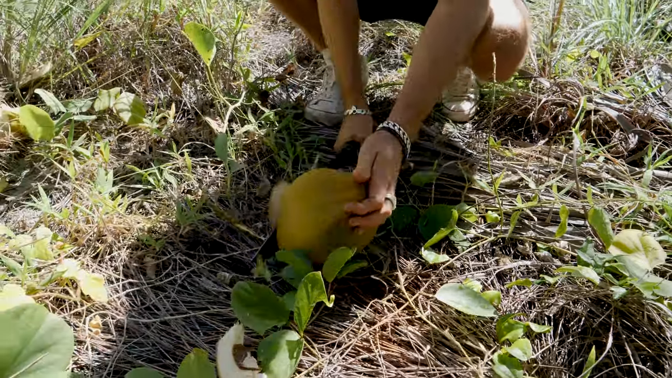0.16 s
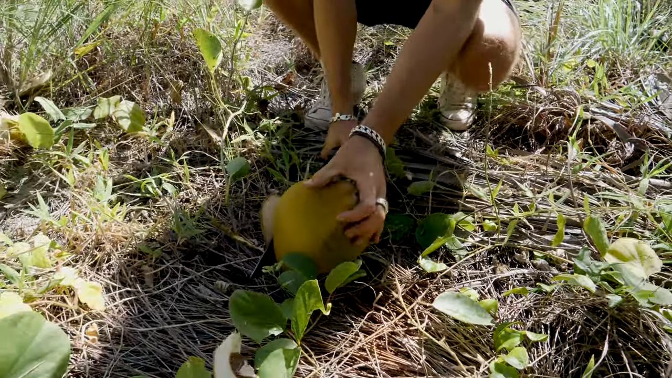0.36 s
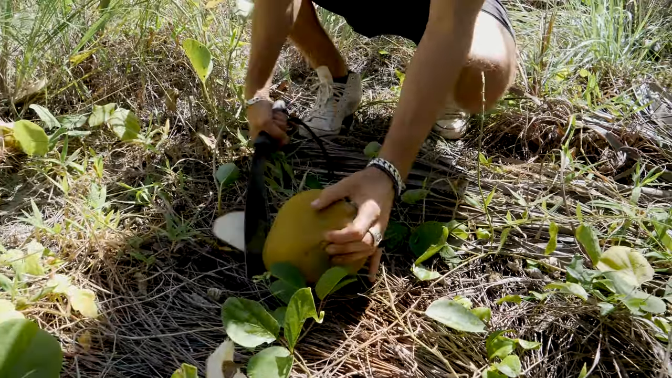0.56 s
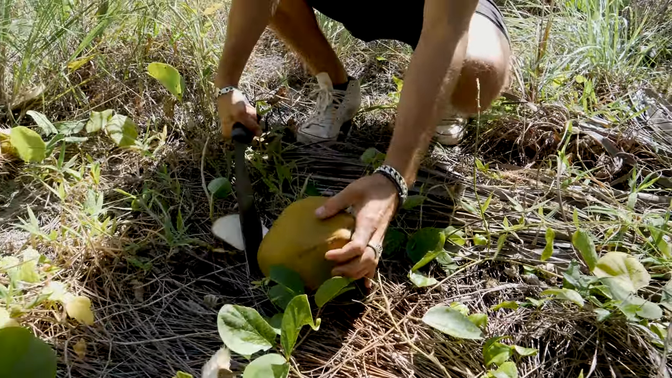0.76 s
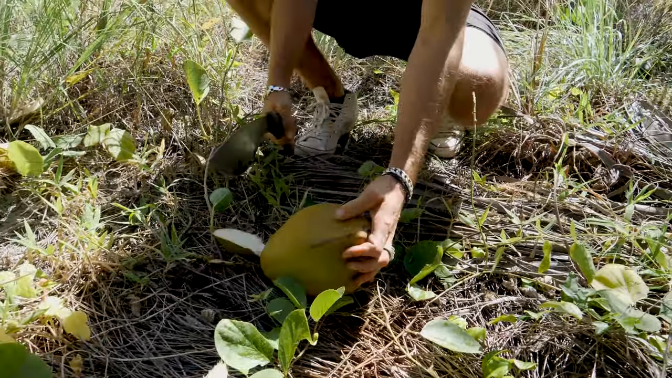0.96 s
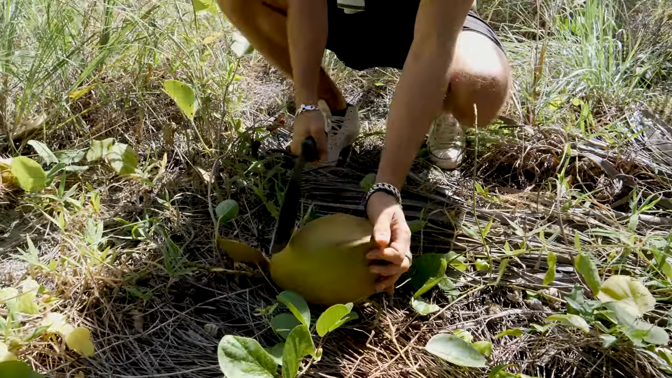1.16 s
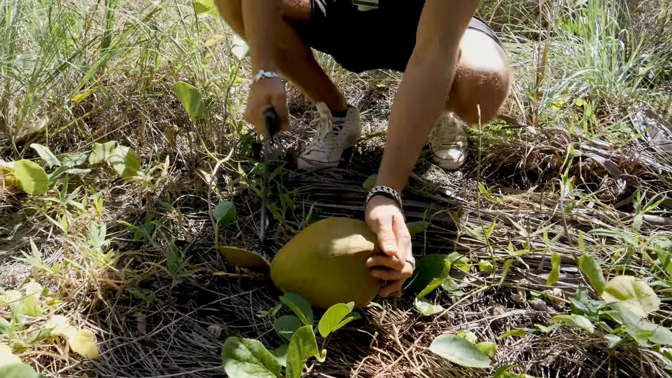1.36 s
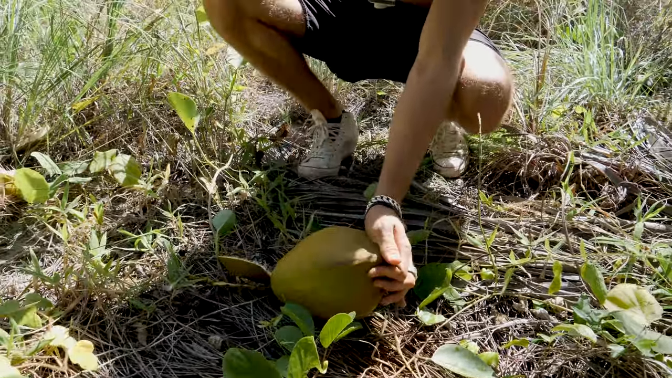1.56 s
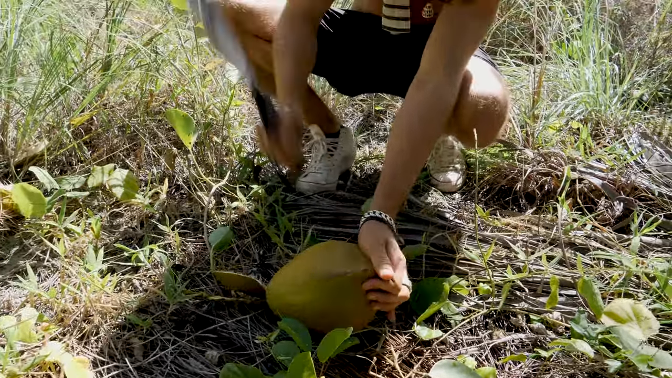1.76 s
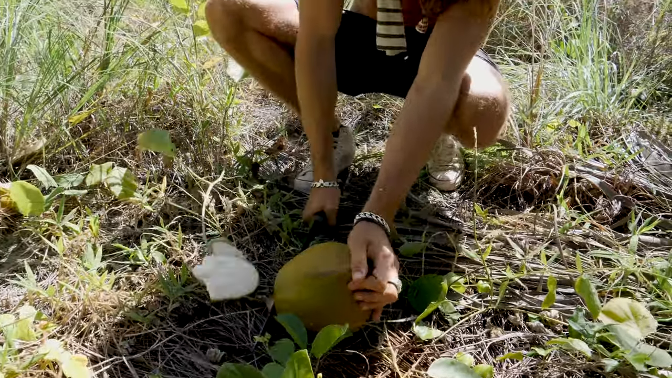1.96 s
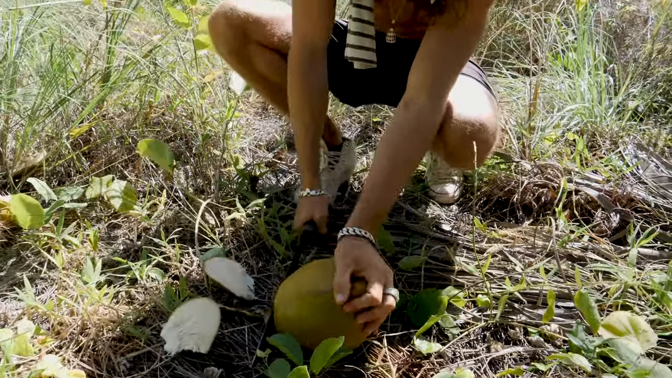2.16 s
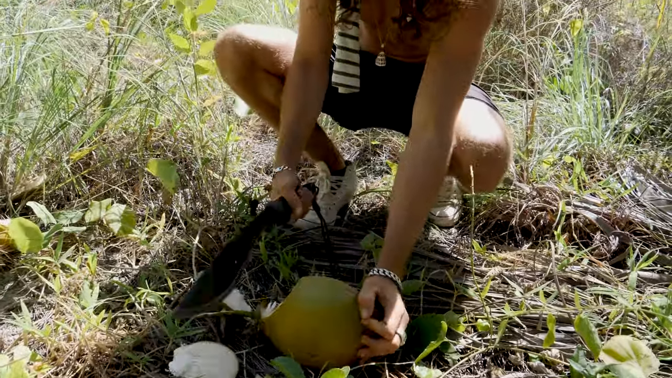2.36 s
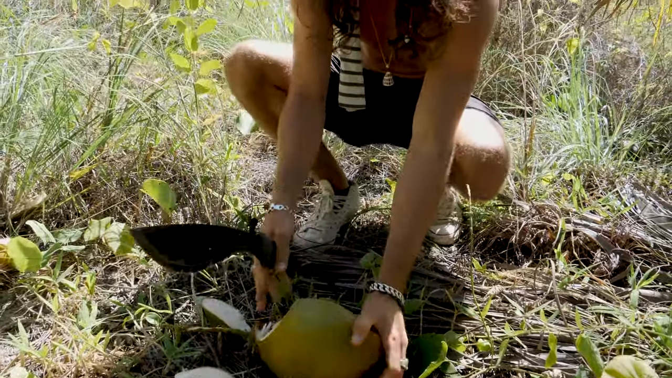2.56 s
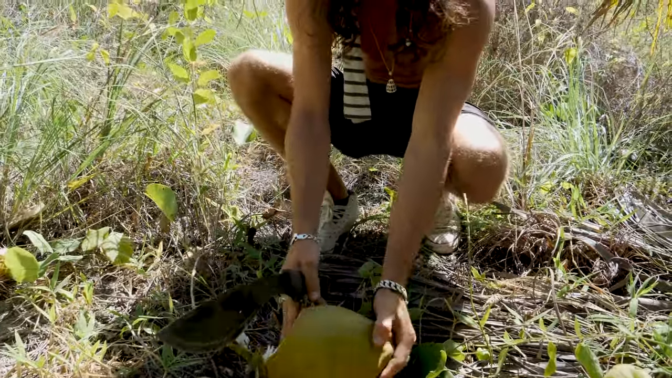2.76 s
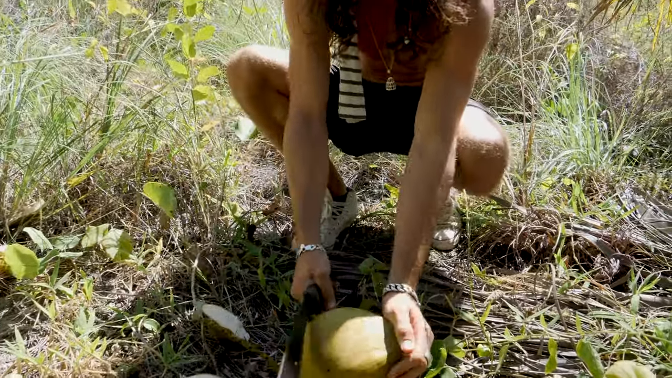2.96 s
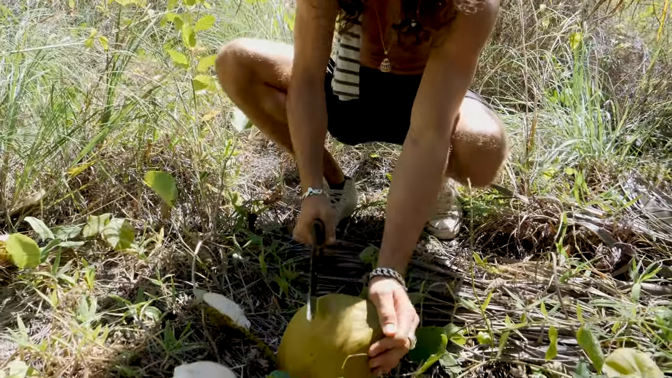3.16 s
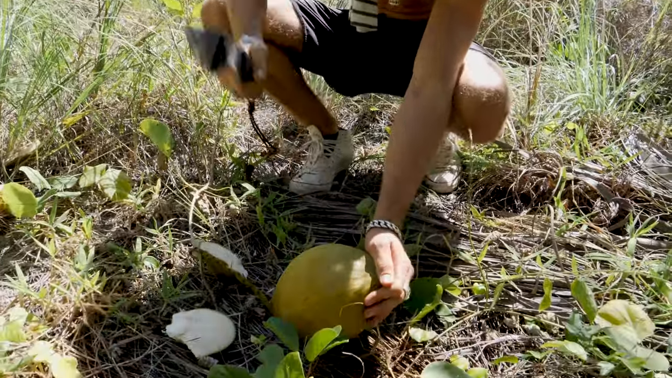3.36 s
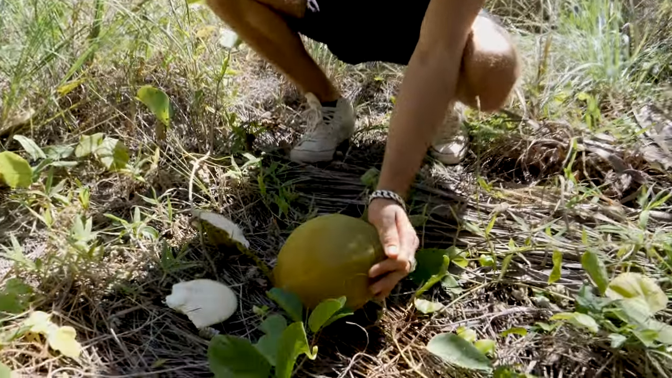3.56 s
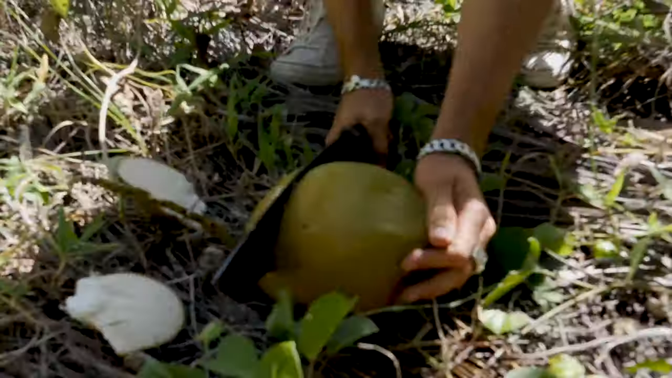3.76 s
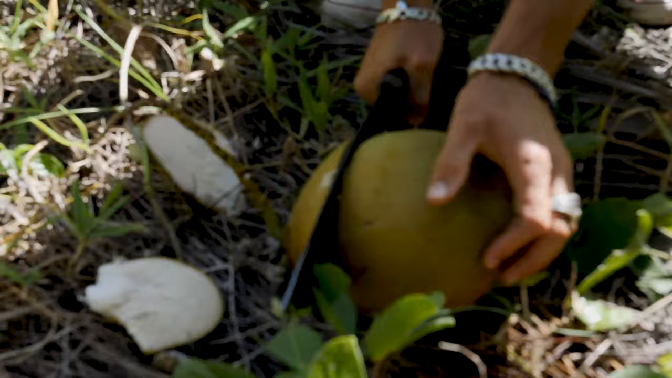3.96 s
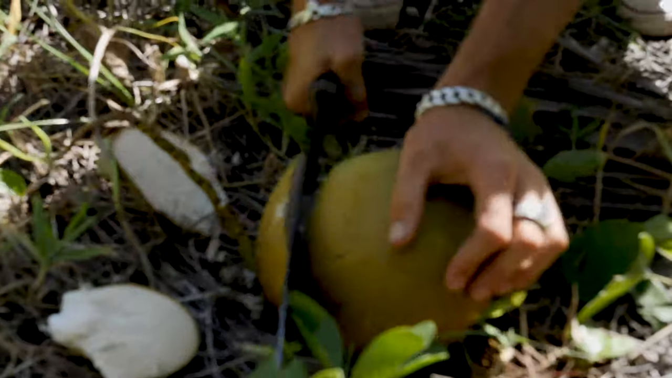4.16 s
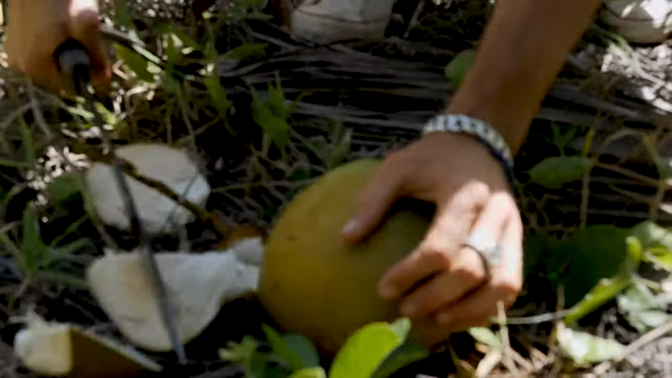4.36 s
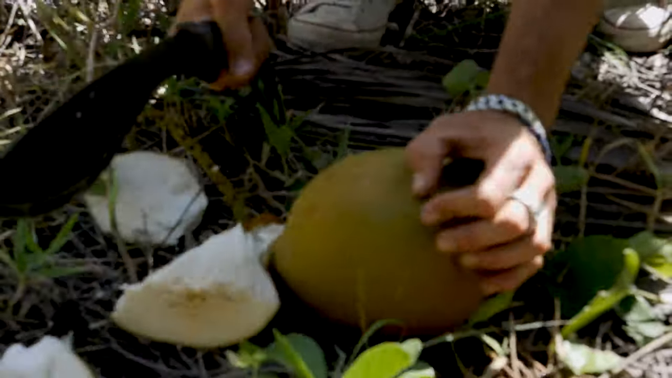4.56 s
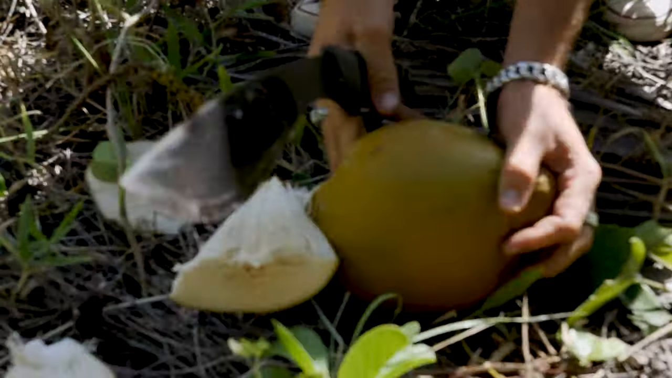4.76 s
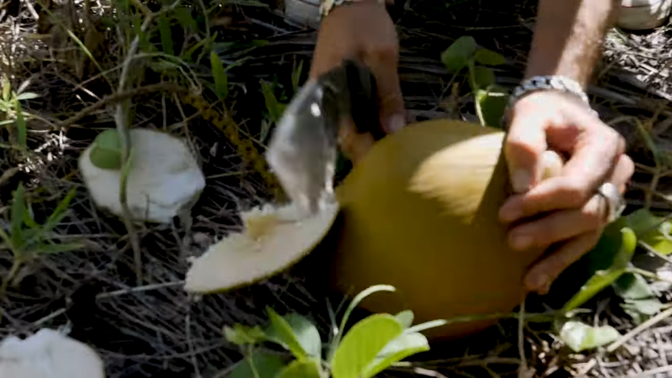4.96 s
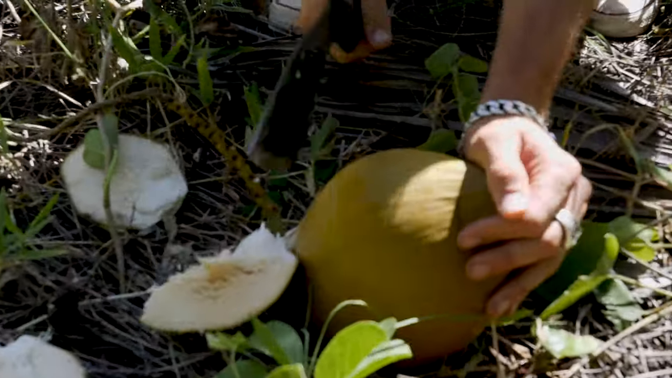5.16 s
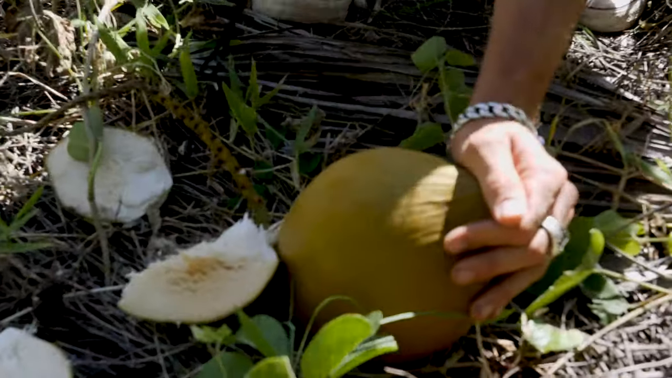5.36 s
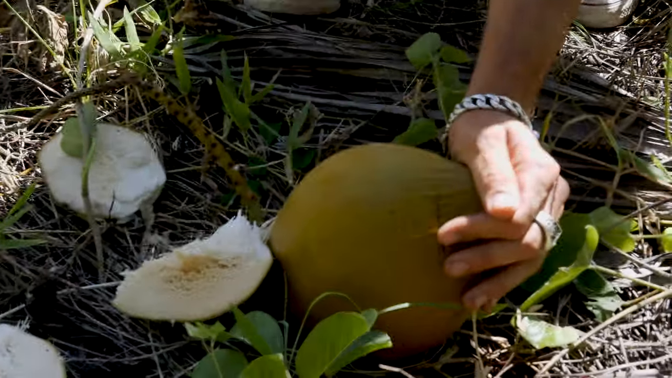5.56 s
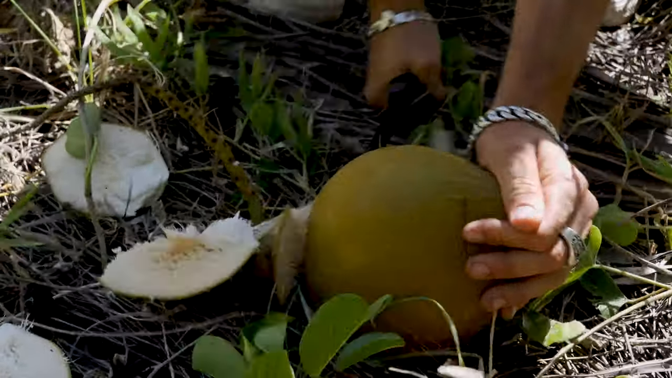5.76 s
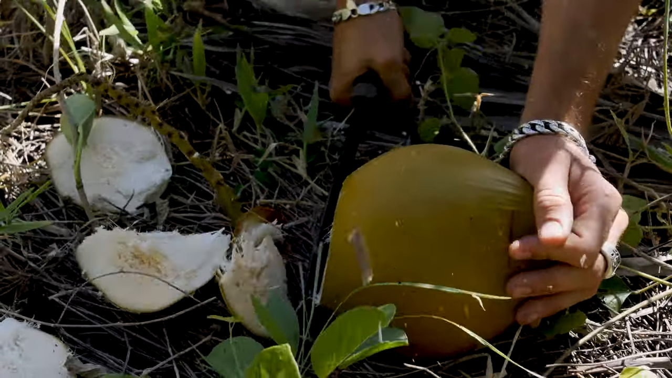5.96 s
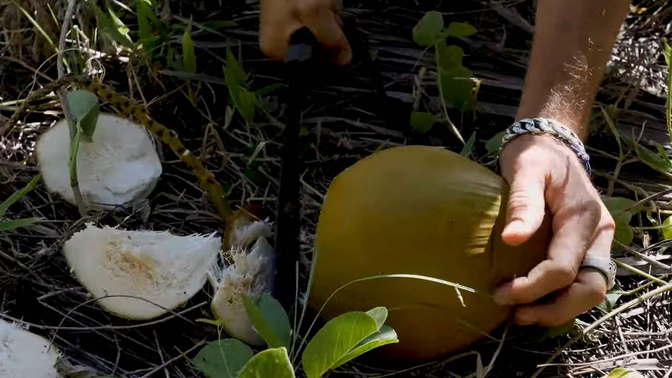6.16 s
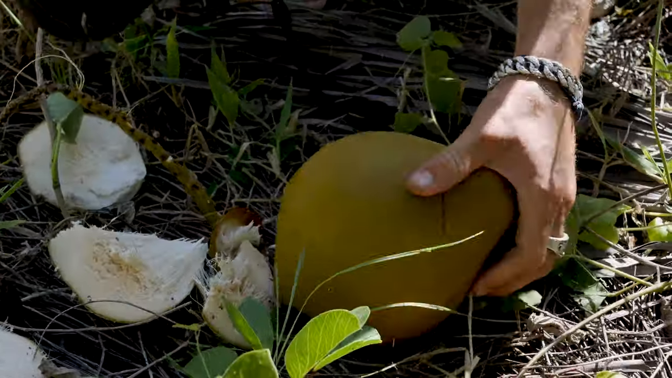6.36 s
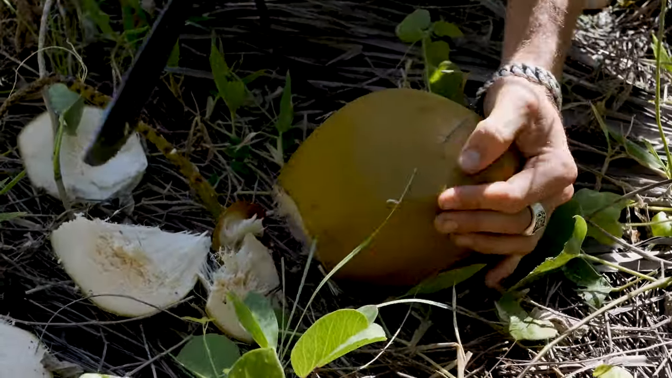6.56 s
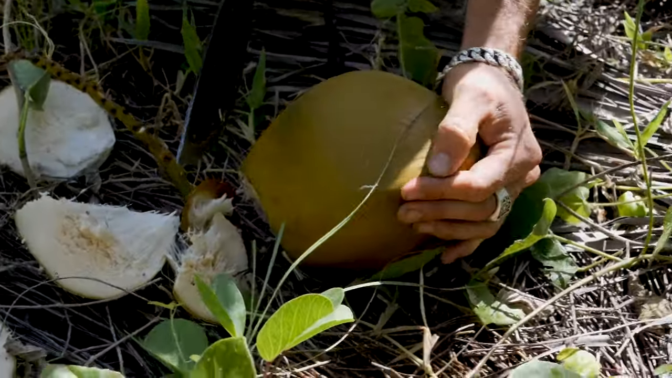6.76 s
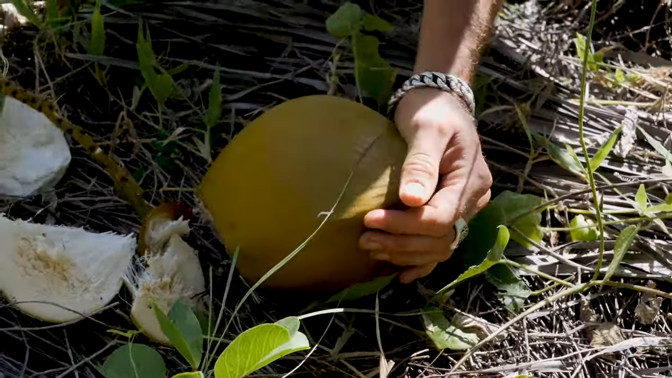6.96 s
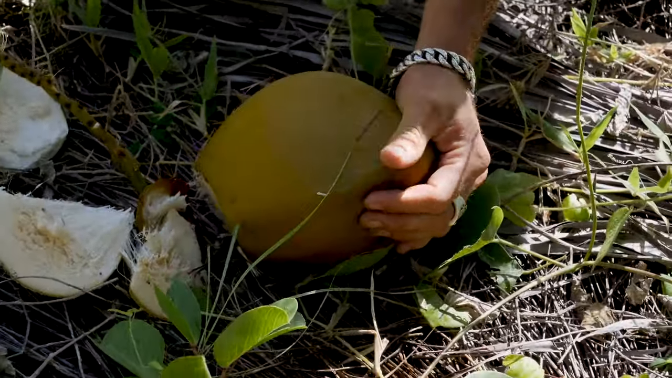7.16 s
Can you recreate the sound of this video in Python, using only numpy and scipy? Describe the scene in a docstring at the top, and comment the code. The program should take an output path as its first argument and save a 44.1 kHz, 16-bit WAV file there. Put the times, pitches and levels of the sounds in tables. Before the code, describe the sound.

Outdoors, close to a small bright microphone, faint hiss and low wind rumble continue under dry grass ticks. At 0.2 s a long knife chops a green coconut: short swish, tearing crack, dull woody body, light thump. Around 0.5-0.7 s fibres and straw snap sharply. At 1.17 s the nut gives a strong hollow knock with a thin steel ring, and a weaker knock follows. The second chop, at 1.85 s, has the heaviest ground thump; rustle and snaps follow to 2.4 s, then it quiets, with a light knock at 3.2 s and a snap at 3.6 s. The third chop lands at 3.79 s; the wedged blade creaks faintly at 4.0 s, then prying brings a crunchy cluster of knocks and tearing at 4.25-4.45 s. Soft rustling leads to the fourth chop at 5.81 s, then snaps near 6.1 s, a tiny steel ting at 6.25 s and fading straw rustle to 7 s.

```python
"""A light low wind rumbles over a faint hiss and dry grass rustles: shaped noise and crackle follow level tables.
Husk fibres and straws snap throughout as short noise bursts, while a long knife chops a green coconut
held on the grass: each of four hard blows is a swish, a tearing burst, ringing nut modes and a ground thump.
Between them come prying and turning: the nut knocks, the steel rings, the wedged blade creaks.
A small close microphone with a bright resonance, gain control and overload picks it up."""
import sys
import numpy as np
from scipy import signal
from scipy.io import wavfile

SR = 44100
rng = np.random.default_rng(int(sys.argv[2]) if len(sys.argv) > 2 else 0)


def master(y):
    """Save y as 16-bit WAV."""
    cut = np.clip(np.atleast_2d(y).T, -1, 1)
    pcm = np.round(cut * 32767)  # scale
    wavfile.write(sys.argv[1], SR, pcm.astype(np.int16))


N = 317079


def amp(db):
    """Decibels to gain."""
    return 10 ** (np.asarray(db) / 20)


def rms_one(x):
    """Scale to unit power."""
    return x / np.sqrt(np.mean(x ** 2) + 1e-20)


def in_time(rows):
    """Table columns joined by straight lines, one value a sample."""
    s, *columns = np.transpose(rows)
    return [np.interp(np.arange(N) / SR, s, c) for c in columns]


def band(x, low_hz, high_hz):
    """Butterworth band-pass."""
    sos = signal.butter(2, [low_hz, min(high_hz, SR * .45)], "band", fs=SR, output="sos")
    return signal.sosfilt(sos, x)


def drift(rate_hz):
    """Slow random wander of spread 1: noise through a double one-pole low-pass."""
    r = np.exp(-2 * np.pi * rate_hz / SR)
    noise = rng.standard_normal(N + SR)
    return rms_one(signal.lfilter([1], [1, -2 * r, r * r], noise)[SR:])   # first second settles


def ring(x, hz, t60_s):
    """Two-pole resonator: a unit click sets a sine of about height 1 ringing."""
    r, w = amp(-60 / (t60_s * SR)), 2 * np.pi * hz / SR
    return signal.lfilter([0, np.sin(w)], [1, -2 * r * np.cos(w), r * r], x)


def coloured(source, spectrum, flicker_db):
    """Quarter-octave bands, fed in turn by two draws of the source, each with a level and flicker; rms 1."""
    hz, db = np.transpose(spectrum)
    edges_hz = hz[0] * 2 ** np.arange(0, np.log2(hz[-1] / hz[0]) + .3, 1 / 4)
    draws = [source(), source()]
    wander = [drift(13.6), drift(7.8), drift(6.6)]
    out = 0
    for k, (low, high) in enumerate(zip(edges_hz, edges_hz[1:])):
        level_db = np.interp(np.log(low * high) / 2, np.log(hz), db)
        out = out + amp(level_db + flicker_db * wander[k % 3]) * band(draws[k % 2], low, high)
    return rms_one(out)


def add(out, piece, s):
    """Mix a short piece in at time s."""
    i = max(round(s * SR), 0)
    out[i:i + len(piece)] += piece[:len(out) - i]


# Low wind rumble on the microphone, drifting and dipping in level. Each row: time in seconds, level in dB.
WIND_RUMBLE = [(0.0, -48), (0.4, -53), (1.36, -48.5), (2.3, -52.5), (3.68, -47), (3.83, -49.5),
               (4.58, -46.5), (5.73, -50), (5.83, -55.5), (7.19, -46.5)]
# Spectrum of the outdoor hiss. Each row: frequency in Hz, relative density in dB per Hz.
AIR_SPECTRUM = [(12, -29), (20, 15), (106, -17.5), (274, -4), (333, -1), (535, -8), (908, -5),
                (3010, -20.5), (6560, -27), (8660, -82), (10500, -45), (13900, -51), (15600, -47)]
AIR_DB = -47.5


def air():
    """Outdoor hiss as shaped noise; wind on the microphone port as lumpy low noise."""
    white = lambda: rng.standard_normal(N)
    hiss = amp(AIR_DB) * coloured(white, AIR_SPECTRUM, flicker_db=-0.86)
    lumps = amp(2.0 * drift(9.2))
    upper = rms_one(band(white(), 61, 168))
    lower = amp(-4.0) * amp(1.8 * drift(5.6)) * rms_one(band(white(), 16, 36.0))
    return hiss + amp(in_time(WIND_RUMBLE)[0]) * lumps * (upper + lower)


# Shoves of nut, blade or husk piece through the grass. Each row: peak in seconds, seconds to swell by 20 dB,
# seconds to fade by 20 dB (anything below 0.005 counts as 0.005: an abrupt start or stop),
# straw hiss in dB, leaf scratch in dB, husk scuff in dB.
RUBS = [(0.199, 0.07, 0.18, -34, -37.5, -46), (0.40, 0.25, 0.8, -48.5, -51.5, -50),
        (0.54, 0.01, 0.13, -30, -38, -35), (0.651, 0.11, 0.06, -33.5, -39, -37),
        (0.745, 0.38, -0.03, -48, -39.5, -54), (0.838, 0.3, .1, -43.5, -44.5, -58),
        (0.934, -0.3, -0.2, -48, -56, -50), (1.115, 0.3, 0.2, -43, -57, -50.5),
        (1.2, 0.2, 0.25, -46.5, -51, -49), (1.458, .025, 0.02, -38.5, -41.5, -46),
        (1.866, -0.0274, 0.0423, -17.5, -20.5, -25), (1.928, 0.07, 0.2, -32.5, -37, -40.5),
        (2.103, 0, 0.07, -32, -31, -38), (2.126, .03, .08, -26.5, -34, -36),
        (2.323, 0.34, 0.23, -37, -41, -41.5), (2.778, 0.7, 0.54, -47, -52.5, -54),
        (2.944, .07, .09, -46, -46.5, -42), (3.085, 0.05, 0.13, -48, -50, -48),
        (3.22, 0.1, 0.2, -46, -52, -47.5), (3.305, 0.14, -0.03, -44, -52, -46.5),
        (3.365, .03, 0.13, -43.5, -48, -43.5), (3.437, -0.1, 0.02, -44, -34.5, -47),
        (3.524, -0.5, 0.5, -50.5, -52, -60), (3.62, 0, .12, -53, -53, -51),
        (3.75, 0.15, 0.3, -57, -48, -47.5), (3.819, 0, 0.16, -38.5, -52, -55),
        (3.97, 0.2, 0.3, -46, -51.5, -62), (4.232, 0.12, 0.08, -39, -44, -35.5),
        (4.26, 0.0246, 0.1863, -26.5, -24, -24), (4.326, 0.09, 0, -19.5, -24.5, -38),
        (4.366, 0.1, 0.17, -26, -28.5, -30), (4.516, 0.02, -0.03, -28.5, -37.5, -47),
        (4.64, 0.66, 0.35, -44, -46.5, -45), (4.985, 0.5, 0, -48, -54, -49),
        (5.035, 0.06, 0.17, -41, -43, -42), (5.087, 0.23, 0.2, -44, -47, -43),
        (5.3, 0.37, .1, -49, -54, -46), (5.48, 0.35, 0.1, -46, -49, -48),
        (5.821, .012, 0.0237, -23, -23.5, -28), (5.87, 0.12, .5, -36, -39.5, -50),
        (6.058, 0, 0.34, -46, -48, -43), (6.165, .07, 0.0438, -28, -34, -35.5),
        (6.262, 0.18, 0.03, -38, -43, -48.5), (6.45, 0.4, 0.3, -54, -61, -45.5),
        (6.563, 0.36, 0.13, -46, -49.5, -40.5), (6.86, 0.13, 0.36, -45, -47.5, -50),
        (6.981, 0.03, .03, -39.5, -40, -47)]
# Floor when nothing moves: straw hiss, leaf scratch, husk scuff, all in dB.
STILL_DB = (-62, -56, -53)


def rubbing():
    """Levels in dB of straw hiss, leaf scratch and husk scuff: each shove swells and fades; powers add."""
    t = np.arange(N) / SR
    power = amp(np.array(STILL_DB))[:, None] ** 2
    for s, swell_s, fade_s, *levels_db in RUBS:
        before, after = (s - t) / max(swell_s, .005), (t - s) / max(fade_s, .005)
        shape = amp(-20 * np.where(t < s, before, after))
        power = power + (amp(levels_db)[:, None] * shape) ** 2
    return 10 * np.log10(power)


def random_clicks(per_s, size_db, largest):
    """Clicks of random sign at random times; size_db scales an exponential draw capped at largest."""
    born = rng.random(N) < per_s / SR
    sizes = amp(size_db * np.minimum(rng.exponential(1, N), largest))
    return born * sizes * rng.choice([-1, 1], N)


def crackle(per_s, size_db):
    """Dense uneven clicks of dry straw on a bed of friction noise, coming in clumps."""
    clumped_per_s = per_s * amp(5 * drift(25))
    return rms_one(random_clicks(clumped_per_s, size_db, largest=5)) + 0.92 * rng.standard_normal(N)


# Straw and leaf rustle with microphone colour. Each row: frequency in Hz, relative density in dB per Hz.
BRIGHT_SPECTRUM = [(880, -26), (1500, -1.5), (1900, -2.5), (2860, -4.5), (3840, -4.5), (5250, -3),
                   (6450, -9), (8480, -1.5), (9260, -7.5), (10000, -14), (11700, -15), (13700, -7.5),
                   (15600, -13.5)]
# Husk scuff. Each row: frequency in Hz, relative density in dB per Hz.
DULL_SPECTRUM = [(200, -34), (400, -3.5), (700, -1), (1200, -3.5), (2000, -13.5), (3200, -13.5),
                 (5000, -25.5)]
SPLIT_HZ = 6700   # straw hiss above, leaf scratch below


def rustle(straw_db, leaf_db, husk_db):
    """Grass and loose husk rub: all bands swell together in short scuffs, single straws tick."""
    scuffs = amp(1.34 * drift(80))
    ticks = random_clicks(70, size_db=4, largest=3)
    bright = coloured(lambda: crackle(1500, size_db=4.0) + amp(21) * ticks, BRIGHT_SPECTRUM, flicker_db=1.3)
    straw, leaf = (rms_one(signal.sosfilt(signal.butter(4, SPLIT_HZ, side, fs=SR, output="sos"), bright))
                   for side in ("high", "low"))
    husk = coloured(lambda: crackle(700, size_db=4.5), DULL_SPECTRUM, flicker_db=3.0)
    return scuffs * (amp(straw_db) * straw + amp(leaf_db) * leaf + amp(husk_db) * husk)


# Clearest fibres and straws snapping. Each row: start in seconds, peaks of bright, middle, dull part in dB.
SNAPS = [(0.0322, -27, -29, -45), (0.0442, -32, -29.5, -33), (0.0705, -24, -24, -30.5),
         (0.1425, -15.5, -18.5, -26.5), (0.1773, -22, -33, -26.5), (0.5136, -4.5, -7, -12),
         (0.5292, -11.5, -5, -8), (0.5381, -13.5, -10, -15), (0.545, -7, -10, -10.5),
         (0.5487, -23, -22, -21), (0.5555, -22, -36, -29), (0.56, -21, -29, -14), (0.5653, -8, -18, -15),
         (0.5692, -11, -23, -25), (0.5872, -12, -14, -17), (0.5926, -20, -21, -16), (0.6101, -17, -34, -26),
         (0.6536, -19, -28, -25), (0.68, -18, -19, -18), (0.7732, -24, -37, -43), (0.929, -24, -43, -36),
         (1.1688, -23, -22, -18), (1.308, -28.5, -34, -46), (1.4118, -30.5, -45, -45),
         (1.4549, -21, -26, -31), (1.4955, -38, -28, -41), (1.7095, -36, -41, -46),
         (1.781, -26.5, -25, -25), (1.8915, -10, -32, -31), (2.1012, -20, -17, -23), (2.106, -7, -35, -25),
         (2.1233, -13, -22, -21), (2.291, -23, -27, -32), (2.3257, -15, -36, -29), (2.371, -22, -30.5, -34),
         (2.4387, -24, -31, -37.5), (2.7022, -32, -32, -31), (2.739, -27, -36, -34),
         (3.0518, -33.5, -45, -47), (3.161, -30, -44, -46), (3.3595, -11, -21, -25.5),
         (3.381, -27, -28, -40.5), (3.4245, -30, -30, -30), (3.5193, -28, -44, -50),
         (3.529, -22.5, -33, -37), (3.6001, -24, -30, -29), (3.614, -6, -11, -19.5), (3.652, -40, -28, -22),
         (3.9878, -29, -34, -39.5), (4.128, -30.5, -37, -40), (4.2317, -22, -30, -21), (4.2805, -9, -9, -9),
         (4.2883, -7.5, -6, -19), (4.3128, -5.5, -4.5, -20), (4.3242, -4.5, -23, -5.5),
         (4.3294, -4, -24, -20), (4.3711, -15, -26, -23), (4.3911, -10, -17, -30), (4.4497, -13, -34, -34),
         (4.508, -13, -25, -38), (4.6287, -21.5, -42, -24), (4.6766, -28, -28, -28),
         (4.7455, -25, -33.5, -36), (4.991, -34, -33, -42), (5.061, -30, -30, -34), (5.078, -25, -26, -37),
         (5.0903, -19, -17.5, -36), (5.2794, -28, -37, -46), (5.376, -30, -32.5, -35),
         (5.4317, -18.5, -27.5, -45), (5.4397, -21, -27, -39), (5.4745, -20.5, -27.5, -34),
         (5.7583, -15.5, -20, -23.5), (5.941, -25, -23.5, -27), (6.0589, -10.5, -21.5, -34),
         (6.0828, -18.5, -19, -25), (6.1635, -8, -18.5, -17.5), (6.172, -10, -16.5, -30),
         (6.2548, -21, -23.5, -28), (6.4461, -28, -28, -44.5), (6.736, -34, -49, -37),
         (6.8143, -28.5, -34, -37.5), (6.9752, -22, -27, -41)]
SNAP_T60_S = 0.0074
SNAP_BANDS_HZ = [(7160, 12740), (3330, 5600), (1140, 3500)]   # bright, middle, dull
# Small straws: base level of bright, middle, dull with straw hiss at QUIET_HISS_DB; share of its swing in dB.
SMALL_COUNT, SMALL_BASE_DB, SMALL_SPREAD_DB = 220, (-40, -44, -51), 3.2
SMALL_FOLLOWS, QUIET_HISS_DB = 0.66, -50


def snaps(straw_db):
    """Each snap is a click and a fast-dying noise burst in three bands; small ones follow the straw hiss."""
    out, t = np.zeros(N), np.arange(SR // 25) / SR
    where = rng.random(SMALL_COUNT)   # as a share of the scene
    size = np.minimum(rng.exponential(1, (SMALL_COUNT, 1)), 3)
    colour = rng.standard_normal((SMALL_COUNT, 3))
    swing_db = straw_db[(where * N).astype(int), None] - QUIET_HISS_DB
    small_db = SMALL_FOLLOWS * swing_db + SMALL_BASE_DB + SMALL_SPREAD_DB * (size + colour)
    rows = SNAPS + list(np.column_stack([where * N / SR, small_db]))
    noise = rng.standard_normal((len(rows), 3, len(t)))
    decay = amp(-60 * t / SNAP_T60_S) + amp(-14.5) * np.exp(-t / 0.0077)   # burst and weak tail
    for k, (low, high) in enumerate(SNAP_BANDS_HZ):
        parts = band(5.9 * (t == 0) + decay * noise[:, k], low, high)
        for row, part in zip(rows, parts):
            add(out, amp(row[k + 1]) * part / np.abs(part).max(), row[0])
    return out


ECHO_S, ECHO_DB = 0.00351, -12   # bounce off the ground and the crouching body


def blows(times_s, levels_db, tilts_db, contacts_s, dampings, modes):
    """A click with a ragged contact behind it rings the modes; the place struck tilts their strengths."""
    out, t = np.zeros(N), np.arange(SR // 4) / SR
    chance = rng.standard_normal((len(times_s), len(modes)))
    grit = rng.standard_normal((len(times_s), len(t)))
    rows = zip(times_s, levels_db, tilts_db, contacts_s, dampings, chance, grit)
    for s, db, tilt_db, contact_s, damping, luck, rough in rows:
        push = (t == 0) + 0.039 * rough * np.exp(-(t / max(contact_s, .0005)) ** 2)
        sound = np.zeros(len(t))
        for k, (hz, mode_db, t60_s) in enumerate(modes):
            octaves = np.log2(hz / modes[1][0])   # tilt pivots on the second mode
            gain = (-1) ** k * amp(mode_db + tilt_db * octaves + 1.5 * luck[k])
            sound += gain * ring(push, hz, t60_s / max(damping, .5))
        sound = band(sound, modes[0][0] / 2, 6000)   # a small body sends out nothing far below its first mode
        add(sound, amp(ECHO_DB) * sound.copy(), ECHO_S)
        add(out, amp(db) * sound / np.abs(sound).max(), s)
    return out


# Modes of the nut. Each row: frequency in Hz, level in dB, t60 in seconds at damping 1.
NUT_MODES = [(271, 2, 0.016), (372, 2, 0.036), (445, -2, 0.052), (576, -6, 0.041), (767, 6, 0.012),
             (1003, 5, 0.012), (1205, 3, 0.015), (1394, 0.5, 0.016), (1824, -1.5, 0.0045),
             (2320, -20, 0.021)]
# Modes of the ground. Each row: frequency in Hz, level in dB, t60 in seconds at damping 1.
GROUND_MODES = [(72, -2, .1), (110, -2, .07), (145, 0, .065), (200, -3, .05)]
# Hard chops. Each row: start in seconds, crack in dB, body in dB, body tilt in dB/octave,
# damping (divides t60), ground thump in dB, swish in dB, low whoosh in dB, cut length in seconds,
# delay of the deepest bite in seconds.
CHOPS = [(0.202, -8, -2, 1, 1.84, -18.5, -28.5, -51, 0.006, 0.0023),
         (1.8535, -10.5, 0.5, 2, 2.2, -9, -32.5, -52, 0.0053, 0.0025),
         (3.787, -8.5, 2, 5.5, 2.4, -20.5, -28, -38, 0.0036, 0.003676),
         (5.809, -8.5, 1, -2, 1.38, -13.5, -28.5, -50, 0.0048, 0.0013)]
THUMP_DELAY_S, THUMP_CONTACT_S, THUMP_DAMPING = 0.0065, 0.011, 1.3   # a low ground thump follows just after each chop


def chops():
    """The blade swishes in, tears through the husk for a few ms, the nut rings and then the ground thumps."""
    (starts_s, cracks_db, bodies_db, tilts_db, dampings, thumps_db,
     swishes_db, whooshes_db, cuts_s, bites_s) = np.transpose(CHOPS)
    one = np.ones(len(starts_s))
    body = blows(starts_s + bites_s, bodies_db, tilts_db, cuts_s, dampings, NUT_MODES)
    thump = blows(starts_s + THUMP_DELAY_S, thumps_db, 0 * one, THUMP_CONTACT_S * one,
                  THUMP_DAMPING * one, GROUND_MODES)
    t = np.arange(SR // 5) / SR
    to_hit_s = t[::-1]
    tearing, swish, whoosh = np.zeros((3, N))
    rows = zip(starts_s, cracks_db, swishes_db, whooshes_db, cuts_s, bites_s)
    for s, crack_db, swish_db, whoosh_db, cut_s, bite_s in rows:
        cut = np.exp(-((t - bite_s) / np.where(t < bite_s, bite_s, cut_s)) ** 2)   # grows to the deepest bite
        settling = amp(-16.5) * np.exp(-t / 0.029)   # fibres trail behind
        add(tearing, amp(crack_db) * (cut + settling), s)
        add(swish, amp(swish_db) * np.exp(-to_hit_s / 0.015), s - t[-1])   # swells as the blade speeds up
        sweep = np.exp(-((to_hit_s - .06) / 0.055) ** 2)   # the arm's sweep comes first
        add(whoosh, amp(whoosh_db) * sweep, s - t[-1])
    noise = rng.standard_normal((3, N))
    crack = tearing * amp(0.83 * drift(900)) * rms_one(band(noise[0], 680, 12500))
    swish = swish * rms_one(band(noise[1], 500, 1290))
    whoosh = whoosh * rms_one(band(noise[2], 200, 302))
    return body + thump + crack + swish + whoosh


# Knocks on the nut, some dull, some bright. Each row: start in seconds, peak in dB, tilt in dB/octave,
# contact length in seconds, damping (divides t60; below 0.5 counts as 0.5; lower rings longer),
# ground thump in dB.
KNOCKS = [(0.455, -29.5, -1, 0.00099, 2.5, -44), (1.1674, -5, -3.5, 0.0078, 1.4, -55),
          (1.227, -17, -3.5, 0.01, 2.5, -49), (1.244, -22.5, -2.5, 0.0024, 1.2, -35),
          (2.137, -28.5, 4, 0.0018, 1.4, -34), (3.235, -20.5, -2, 0.0011, 1.45, -42),
          (3.729, -51, -9, 0.002, 2.9, -27), (4.016, -25, -2.5, 0.002, 0.79, -40),
          (4.2535, -9, 10.5, 0.0085, 0.43, -39), (4.259, -8.5, 8, 0.0015, 1.5, -46),
          (4.282, -11.5, 5, 0.00087, 1.5, -54), (4.323, -12.5, -2, 0.0032, 2.6, -37),
          (4.384, -19, -6, 0.0012, 1.7, -36), (4.679, -30.5, 3, 0.0021, 1.6, -50),
          (4.8495, -22, 5.5, 0.0024, 0.44, -42), (5.031, -23.5, 0, 0.0064, 0.93, -42),
          (6.092, -30, -2, 0.0033, 0.62, -30)]


def knocks():
    """Lighter blows ring the nut; some of the push goes on into the ground."""
    s, peak_db, tilt_db, contact_s, damping, thump_db = np.transpose(KNOCKS)
    nut = blows(s, peak_db, tilt_db, contact_s, damping, NUT_MODES)
    ground = blows(s, thump_db, 0 * s, contact_s, damping, GROUND_MODES)
    return nut + ground


# Steel rings free after a glancing tap until it touches again. Each row: start in seconds, stop in seconds,
# frequency in Hz, level in dB, t60 in seconds.
BLADE_RINGS = [(1.168, 1.242, 4834, -38, 1.0), (6.254, 6.30, 9500, -38, .12), (6.254, 6.31, 12050, -42, .2)]


def blade():
    """Each glancing tap leaves a mode of the steel ringing, a decaying sine, until a touch damps it."""
    out, t = np.zeros(N), np.arange(SR // 10) / SR
    for start_s, stop_s, hz, db, t60_s in BLADE_RINGS:
        on = np.clip(t / .006, 0, 1) * np.clip((stop_s - start_s - t) / .008, 0, 1)
        add(out, on * amp(db - 60 * t / t60_s) * np.sin(2 * np.pi * hz * t), start_s)
    return out


# The wedged blade slips in the wet husk. Each row: time in seconds, pitch in Hz, first partial in dB,
# third partial in dB.
CREAK = [(4.002, 570, -55, -70), (4.014, 520, -40, -62), (4.026, 470, -38, -62), (4.038, 410, -33, -60),
         (4.058, 362, -37, -50), (4.074, 355, -40, -46), (4.092, 395, -52, -60)]


def creak():
    """Stick-slip of the levered blade: a short, unsteady tone, mostly falling, with its third partial."""
    hz, first_db, third_db = in_time(CREAK)
    t = np.arange(N) / SR
    phase = 2 * np.pi * np.cumsum(hz * (1 + .03 * drift(120))) / SR
    fade = np.clip(np.minimum(t - CREAK[0][0], CREAK[-1][0] - t) / .01, 0, 1)
    on = fade * amp(1.5 * drift(60))
    return on * np.sqrt(2) * (amp(first_db) * np.sin(phase) + amp(third_db) * np.sin(3 * phase))


# Microphone port resonance: centre in Hz, width in Hz, gain in dB.
MIC_PEAK = (8300, 2000, 7)
# Notch above it: centre in Hz, width in Hz, gain in dB.
MIC_DIP = (10700, 1800, -9)


def scene():
    """Everything arrives at one close microphone; chops and snaps get the colour of its port."""
    rub_db = rubbing()
    hits = chops() + snaps(rub_db[0])
    for hz, width_hz, db in (MIC_PEAK, MIC_DIP):
        resonance = signal.lfilter(*signal.iirpeak(hz, hz / width_hz, fs=SR), hits)
        hits = hits + (amp(db) - 1) * resonance
    return (hits + knocks() + rustle(*rub_db) + creak() + blade() + air())[None]


CUTOFF_HZ = 15750
DUCK_ABOVE_DB, DUCK_SLOPE, ATTACK_S, HOLD_FALL_DB_PER_S = -8, 0.47, 0.0031, 25


def record(dry):
    """Loud blows pull the gain down and it climbs back; peaks clip; the top is cut."""
    level_db = 20 * np.log10(np.abs(dry) + 1e-6)
    ramp_db = HOLD_FALL_DB_PER_S * np.arange(N) / SR
    held_db = np.maximum.accumulate(level_db + ramp_db, axis=1) - ramp_db   # peak hold, falling steadily
    r = np.exp(-1 / (ATTACK_S * SR))
    duck_db = signal.lfilter([1 - r], [1, -r], DUCK_SLOPE * np.maximum(held_db - DUCK_ABOVE_DB, 0))
    wet = np.clip(dry * amp(-duck_db), -1, 1)
    top_cut = signal.cheby2(12, 40, CUTOFF_HZ + 250, fs=SR, output="sos")
    return np.clip(signal.sosfilt(top_cut, wet), -1, 1)


dry = scene()
out = record(dry)
master(out)
```